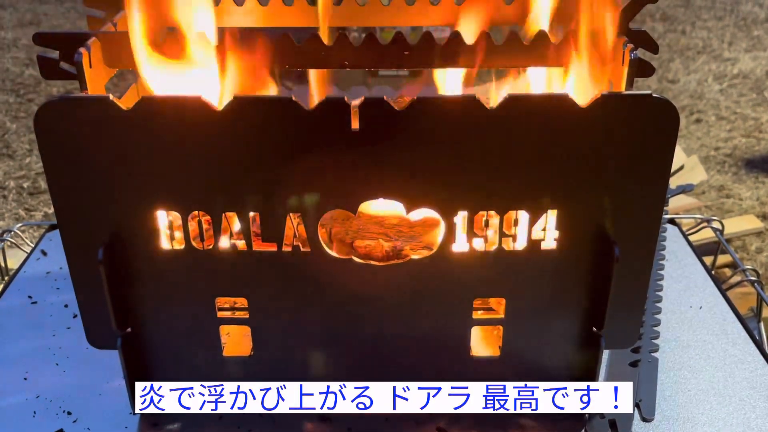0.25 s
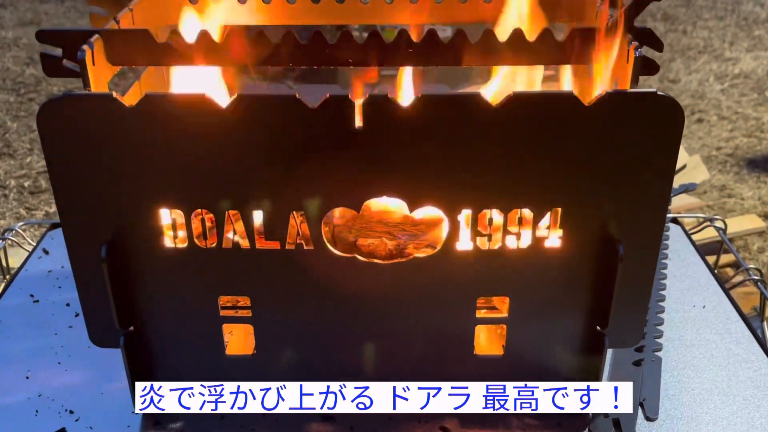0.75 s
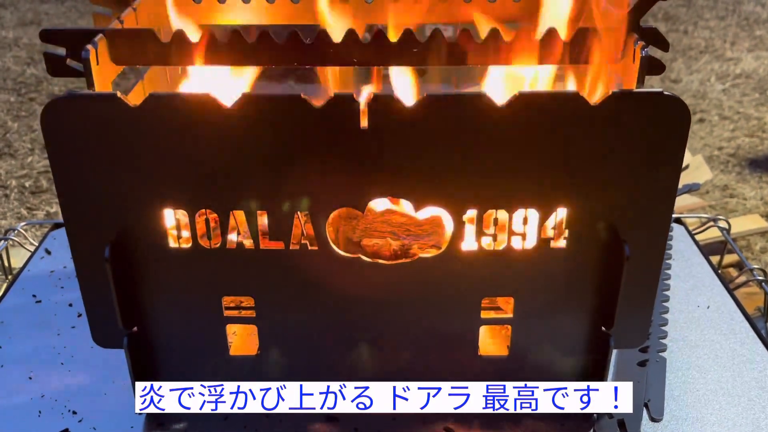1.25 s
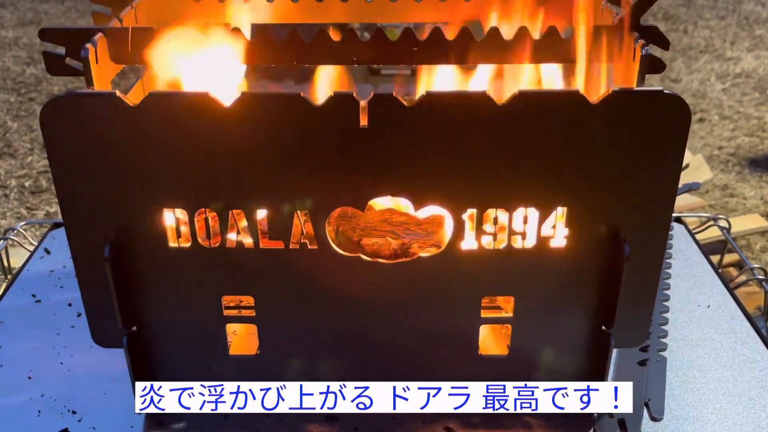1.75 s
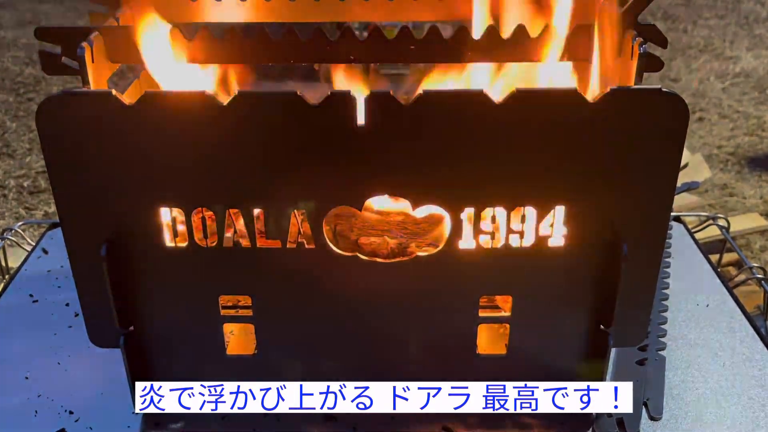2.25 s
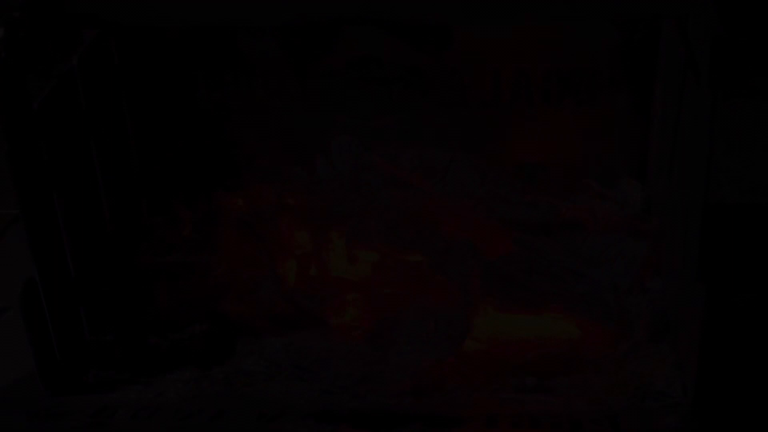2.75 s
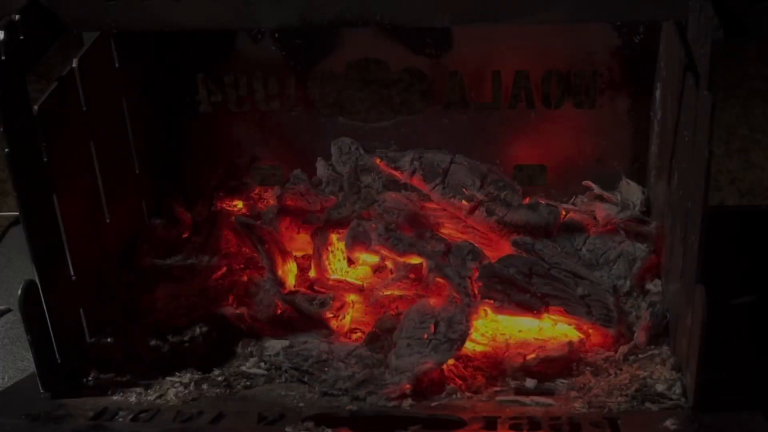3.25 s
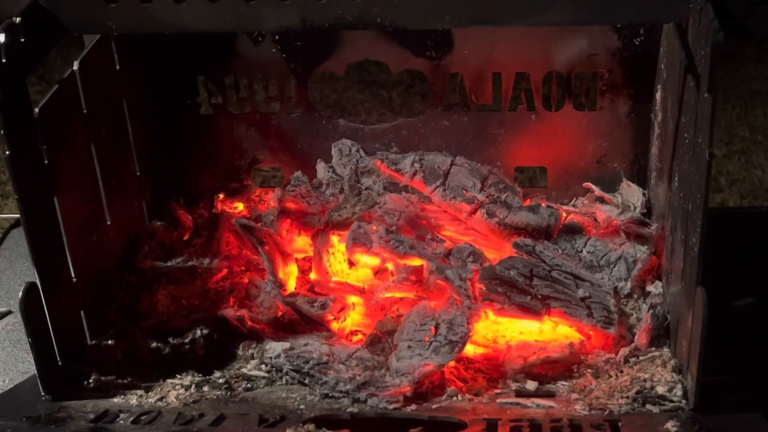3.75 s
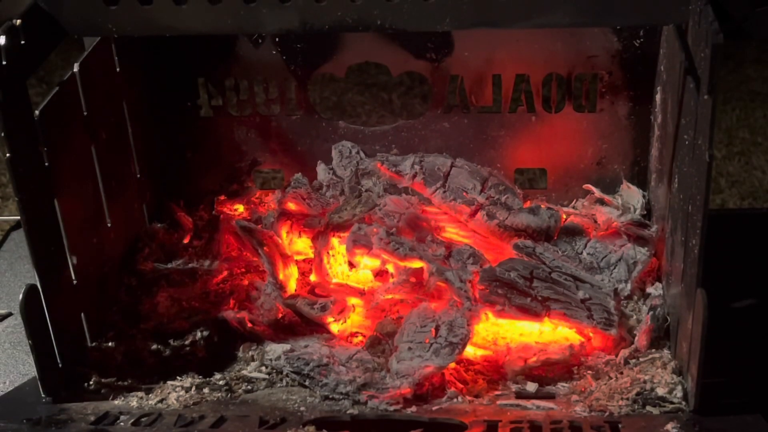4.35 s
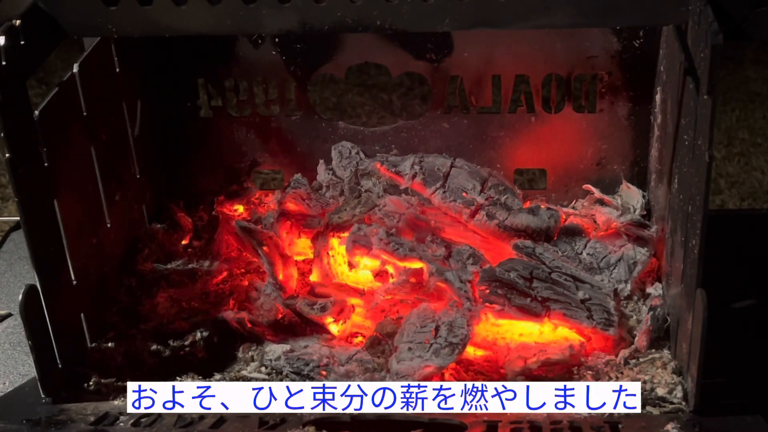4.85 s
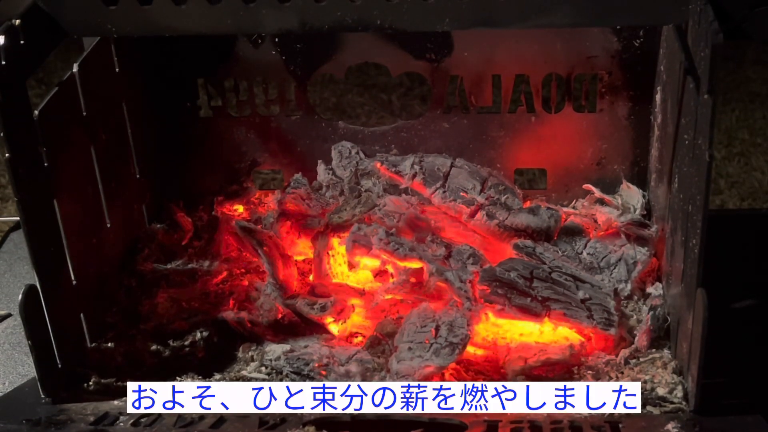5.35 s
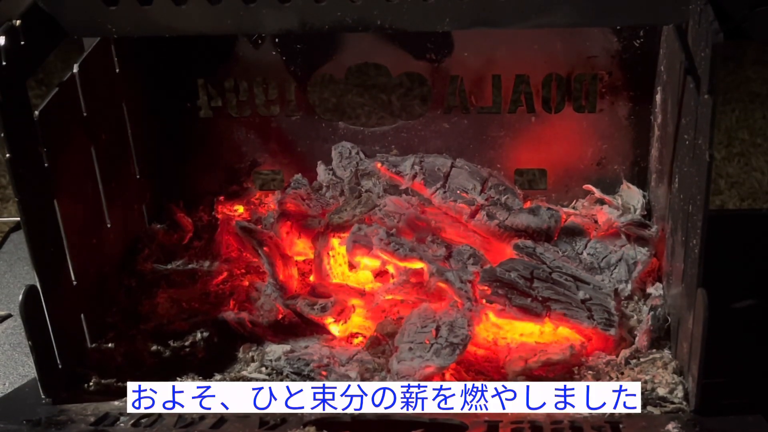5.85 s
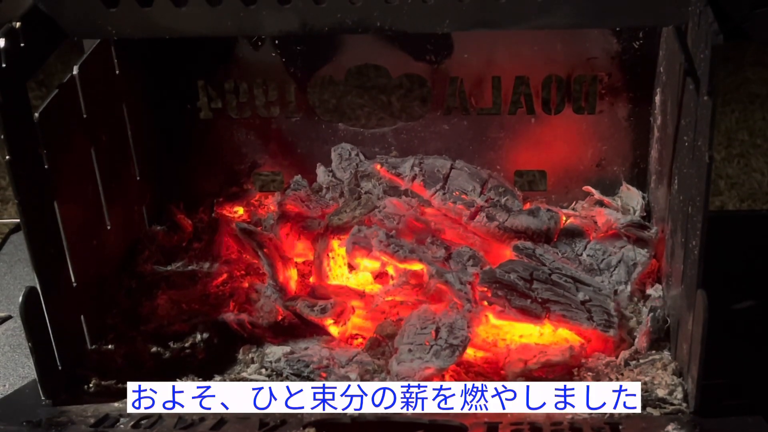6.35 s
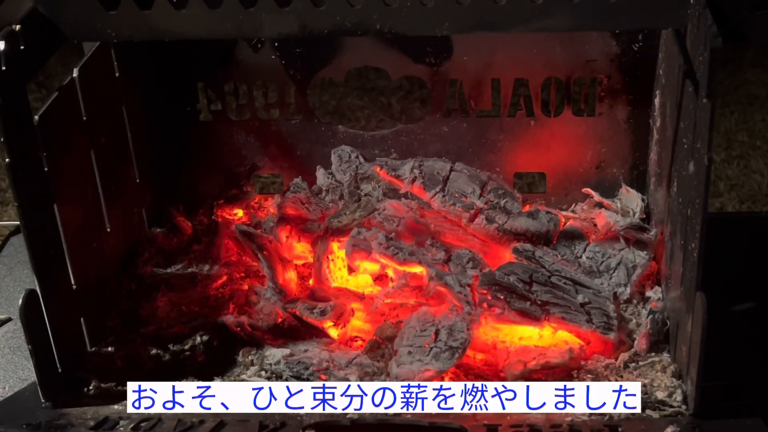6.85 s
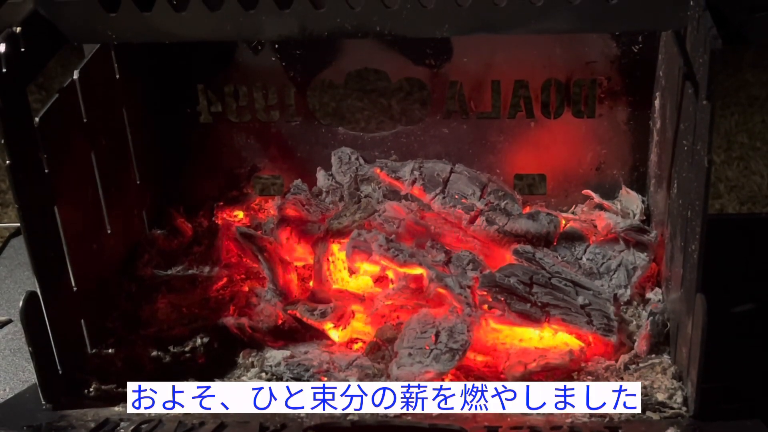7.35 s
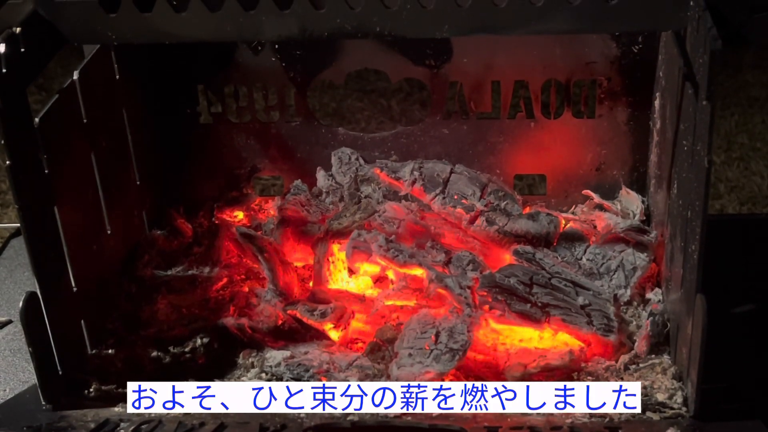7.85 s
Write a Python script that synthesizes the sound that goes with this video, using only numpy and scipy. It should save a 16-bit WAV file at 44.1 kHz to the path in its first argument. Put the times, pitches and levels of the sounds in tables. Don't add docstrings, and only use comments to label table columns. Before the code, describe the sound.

A wood fire in a steel box snaps loudly with puffing flames and hiss, then cuts to quiet embers ticking sparsely, with one late sharp crack.

```python
import sys
import numpy as np
from scipy import signal
from scipy.fft import rfft, irfft, next_fast_len
from scipy.io import wavfile
from scipy.ndimage import map_coordinates

SR = 44100
rng = np.random.default_rng(int(sys.argv[2]) if len(sys.argv) > 2 else 0)


def gain_from_db(level_db):
    decades = np.asarray(level_db, float) / 20
    return 10 ** decades


def inscribe(sig):
    pcm = np.round(np.clip(np.atleast_2d(sig).T, -1, 1) * 32767)
    wavfile.write(sys.argv[1], SR, pcm.astype(np.int16))


N = 357651
SCENE_CHANGE_S = 2.672

BOX_TONES = [2800, 4350, 5500]
# [freq_hz, gain_db]
PORT_RESONANCE = [(5000, -0.5), (8600, 6), (9700, 10), (10800, 17), (12100, -0.5), (13000, -16),
                  (15300, -12), (17000, -16.5)]


def unit(x):
    return x / np.sqrt(np.mean(x ** 2) + 1e-20)


def along(points, hz):
    f, v = np.transpose(points)
    return np.interp(np.log(hz + 1), np.log(f + 1), v)


def wobble(rate):
    knots = rng.standard_normal(int(N * rate / SR) + 4)
    return map_coordinates(knots, [np.arange(N) * rate / SR])


def filtered(x, response):
    length = x.shape[-1]
    m = 2 * next_fast_len(length // 2 + min(length // 2, 4096))
    return irfft(rfft(x, m) * response(np.fft.rfftfreq(m, 1 / SR)), m)[..., :length]


def causal(db):
    cepstrum = irfft(np.log(gain_from_db(db)))
    half = len(cepstrum) // 2
    return np.exp(rfft(np.r_[cepstrum[0], 2 * cepstrum[1:half], np.zeros(half)]))


def rush(spectrum, channels=1):
    noise = rng.standard_normal((channels, N))
    return unit(filtered(noise, lambda hz: gain_from_db(along(spectrum, hz))))


def band(rows, low_hz, high_hz):
    edges = [low_hz, min(high_hz, .45 * SR)]
    y = signal.sosfilt(signal.butter(2, edges, "band", fs=SR, output="sos"), rows)
    return y / np.abs(y).max(axis=1, keepdims=True)


def placed(seconds, rows):
    starts = np.round(np.asarray(seconds) * SR).astype(int)[:, None]
    at = starts + np.arange(rows.shape[1])
    return np.bincount(at.ravel(), rows.ravel(), N + 2 * SR)[:N]


def resonance(f, centre_hz, width_hz):
    return 1j * f * width_hz / (centre_hz ** 2 - f * f + 1j * f * width_hz)


def cracks(seconds, crack_db, snap_db, snap_hz, thump_db, length_ms, rattle_db, rattle_t60, echo_db,
           box_share, crack_hz=6500, size=2048):
    t = np.arange(size) / SR
    life = np.clip(length_ms, .2, 20)[:, None] / 1000
    noise = rng.standard_normal((len(seconds), size))
    volley = np.abs(noise) * np.exp(-(t / life) ** 2)
    rattle = gain_from_db(rattle_db - 60 * t / rattle_t60) + gain_from_db(echo_db - 60 * t / .08)
    burst = (1 - np.exp(-t / 0.00016)) * noise * (volley + rattle)

    centre = snap_hz[:, None]
    width = centre * np.interp(crack_db, [-50, -20], [.14, .5])[:, None]

    def ringing(f):
        box = resonance(f, BOX_TONES[0], 330) - 0.86 * resonance(f, BOX_TONES[1], 360)
        return 1.8 * width / centre + resonance(f, centre, width) + box_share * box

    ring = filtered(burst, ringing)
    push = t / .0012 * np.exp(1 - t / 0.00062) * np.sin(2 * np.pi * 470 * t) + 0.55 * burst
    crack = band(band(burst, crack_hz, 20000), crack_hz, 14000)
    snap = gain_from_db(snap_db)[:, None] * band(band(ring, 2200, 5600), 2100, 12000)
    thump = gain_from_db(thump_db)[:, None] * band(push, 300, 1000)
    return placed(seconds, gain_from_db(crack_db)[:, None] * (crack + snap + thump))


def blaze_pops():
    # [start_s, crack_db, snap_db, snap_hz, thump_db]
    strong = [(0.0606, -39, -19, 5600, -20.5), (0.2716, -45.5, 1, 4700, 3.5),
              (0.3752, -26, -17.5, 4530, -19), (0.403, -31.5, -9, 4830, -19),
              (0.4738, -28, -7.5, 6000, -13.5), (0.4883, -32.5, -10.5, 4870, -27),
              (0.5112, -27, -3.5, 3180, -13), (0.614, -27.5, -12.5, 4440, -13),
              (0.6228, -23.5, -8.5, 6250, -11), (0.7869, -38.5, -18.5, 6000, -23),
              (0.9634, -12, -12, 3600, -6), (0.989, -44.5, -0.5, 5470, -15), (1.361, -21, -13, 3250, -1.5),
              (1.4404, -22.5, -10.5, 5350, -18.5), (1.5548, -44.5, -0.5, 6100, -11.5),
              (1.8437, -32.5, -4.5, 4500, -12), (2.074, -30, -12, 6020, -18),
              (2.204, -27.5, -23, 5450, -50), (2.3325, -34, -11.5, 3930, -40.5),
              (2.4621, -36, -21, 5250, -38), (2.5229, -51, -1, 4160, 7), (2.6298, -31, -15.5, 5000, -23),
              (2.6387, -32, -1, 6000, -10)]
    # [start_s, crack_db, snap_db]
    small = [(0.0727, -46, -2.5), (0.112, -50, -13), (0.13, -42.5, -21), (0.297, -42, -21),
             (0.3793, -50, -38), (0.3965, -45, -7), (0.6803, -43, -11), (0.7037, -42, -12),
             (0.711, -46, -14), (0.77, -65.5, 11), (1.238, -47.5, -9), (1.258, -39, -20),
             (1.3037, -44.5, -19), (1.343, -56.5, -2), (1.5183, -41.5, -12.5), (1.628, -42.5, -15),
             (1.6805, -45, -6), (1.8287, -52, -2), (1.9234, -45, -20), (2.001, -47.5, -18),
             (2.0507, -40, -19), (2.1683, -40, -9.5), (2.1843, -39, -14.5), (2.2378, -43, -17),
             (2.3187, -49, -9), (2.371, -47, -12), (2.476, -49.5, -6), (2.6107, -45, -16), (0.501, -42, -5),
             (0.78, -50, -5), (1.4232, -48, -16), (2.5885, -52, -7)]
    # [start_s, crack_db, snap_db]
    sparks = [(0.0362, -49, -16), (0.161, -50.5, -16), (0.2144, -55, -27), (0.259, -54, -11),
              (0.3306, -54.5, -14), (0.4319, -49, -7), (0.559, -49.5, -5), (0.7537, -47, -21),
              (0.822, -53, -24.5), (1.0032, -48.5, 4), (1.1952, -56, -22), (1.4804, -59, -6),
              (1.585, -49, -18), (1.6492, -53.5, -4), (1.697, -49, -22), (1.7746, -50, -20),
              (1.975, -49, -13), (1.9904, -47.5, -22), (2.0276, -51, -21), (2.1321, -49.5, -10),
              (2.2677, -55, -10), (2.2952, -51.5, -3.5), (2.447, -52, -25)]
    s, crack_db, snap_db = np.c_[np.transpose(small), np.transpose(sparks) + [[0], [2.5], [-6]]]
    snap_hz = 5060 * gain_from_db(rng.normal(0, 2.5, len(s)))
    spits = [s, crack_db, snap_db, snap_hz, snap_db - 13]
    s, crack_db, snap_db, snap_hz, thump_db = np.c_[np.transpose(strong), spits]
    length_ms = np.interp(crack_db, [-50, -10], [1.1, 1.5])
    return cracks(s, crack_db - 5.0, snap_db + 7.5, snap_hz, thump_db + 8, length_ms,
                  rattle_db=-6.5, rattle_t60=0.032, echo_db=-40, box_share=0.23)


def splits():
    # [start_s, peak_db]
    big = [
        (0.9637, -7.5),
        (1.361, -16.5),
        (7.4857, -16.5),
    ]
    # [mode_hz, width_hz, level_db]
    log_modes = [
        [(1560, 200, -6.5), (2090, 150, -9), (2710, 440, 0), (4810, 420, -2), (6300, 260, -8), (8030, 220, -5), (8300, 350, -2), (9570, 320, -3.5), (10800, 270, -6)] + [(1050, 220, -4)],
        [(3290, 330, 0.5), (6010, 430, -15.5), (7220, 290, -10), (8400, 470, -4), (9086, 170, -6), (11100, 250, 1)],
        [(1570, 160, -22), (2440, 390, -6.5), (3960, 610, -2.5), (5320, 270, -4.5), (6360, 220, -5), (7200, 440, -5.5), (8500, 430, -9), (9300, 330, -8), (11180, 320, -2), (12300, 630, -8.5)] + [(1160, 180, -20), (865, 180, -23)],
    ]
    t, rows = np.arange(1024) / SR, []
    for modes in log_modes:
        hz, width, db = np.transpose(modes)[..., None]
        since = np.clip(t - .0005 * rng.random(hz.shape) - 1.2 / hz, 0, 1)
        shape = np.exp(-4.2 * width * since) * (1 - np.exp(-since / 0.00022))
        level = gain_from_db(db - along(PORT_RESONANCE, hz)) * width
        ring = (level * shape * np.sin(2 * np.pi * hz * since)).sum(axis=0)
        rows.append(ring / np.abs(ring).max())
    s, db = np.transpose(big)
    return placed(s, gain_from_db(db)[:, None] * rows)


def licks():
    # [start_s, peak_db, push_db, edge_db]
    puffs = [(0.047, -55, -7, -16), (0.115, -59, 1, -21), (0.152, -51.5, -5, -26), (0.179, -51, -2, -33),
             (0.202, -50.5, -8, -36), (0.326, -53, -4, -15), (0.357, -43, -11, -15.5), (0.447, -57, 1, -2),
             (0.542, -50, -4, -17), (0.646, -40.5, -11, -21), (0.709, -48.5, -12, -21),
             (0.782, -51, -6, -28), (0.804, -51.5, -5, -16), (0.983, -46.5, -1, -24),
             (1.004, -47.5, -2, -22.5), (1.102, -45, -16, -13), (1.223, -54, -5, -28),
             (1.247, -49.5, -8, -28), (1.283, -53, -4, -24), (1.398, -51, -4, -13), (1.51, -46.5, -16, -15),
             (1.558, -54, -5, -16), (1.597, -55, -3, -24), (1.671, -45.5, -8, -17), (1.826, -47, -8, -14),
             (1.895, -54, 2, -11.5), (1.933, -54, 1, -23), (1.975, -53, 0, -15), (1.996, -50, -3, -24),
             (2.009, -44.5, -8, -24), (2.104, -67, 5, -5), (2.147, -50, -8, -20), (2.186, -58, -9, -16),
             (2.255, -52, -2, -19), (2.273, -49, -4, -26), (2.282, -46.5, -6, -18),
             (2.298, -44.5, -10, -17), (2.326, -50, -12, -21), (2.415, -45.5, -13, -23),
             (2.433, -54, -4, -24), (2.524, -45, -14, -11), (2.537, -44.5, -12, -12.5),
             (2.58, -43.5, -15, -21), (2.622, -43, -18, -8.5), (0.948, -43, -10, -18)]
    # [freq_hz, level_db_per_hz]
    flap_colour = [(150, -29.5), (300, -5.5), (480, -1), (800, -11), (1400, -24), (3000, -37), (8000, -54)]
    s, db, push_db, edge_db = np.transpose(puffs)
    t = np.arange(2048) / SR
    noise = rng.standard_normal((2, len(s), len(t)))
    flap = filtered(noise[0], lambda hz: gain_from_db(along(flap_colour, hz))) * t * np.exp(-t / 0.0055)
    flap = flap / np.abs(flap).max(axis=1, keepdims=True)
    flap_hz, push_hz = gain_from_db(rng.normal(0, 1.5, (2, len(s), 1))) * [[[420]], [[105]]]
    sinking = t + 0.0011 * (1 - np.exp(-t / .0015))
    fall = np.sin(2 * np.pi * flap_hz * sinking) * t / .0015 * np.exp(1 - t / .0015)
    push = np.sin(2 * np.pi * push_hz * t) * t / 0.0028 * np.exp(1 - t / 0.004)
    edge = band(noise[1] * np.exp(-t / .0025), 800, 2100)
    rows = .25 * flap + .95 * fall + gain_from_db(push_db + 3.0)[:, None] * push
    rows = rows + gain_from_db(edge_db + 6.5)[:, None] * edge
    return placed(s, gain_from_db(db - 0.5)[:, None] * rows)


def ember_ticks():
    # [start_s, crack_db, snap_db, snap_hz]
    clear = [(2.7883, -42.5, -29.5, 2690), (2.9114, -47.5, -18.5, 4140), (3.0523, -40.5, -18, 4420),
             (3.1001, -40, -25, 5570), (3.1179, -41.5, -20, 4130), (3.261, -37.5, -34, 3800),
             (3.365, -43, -16.5, 4440), (4.091, -36, -19, 5790), (4.2159, -44, -30, 5430),
             (4.3584, -45, -16, 5230), (4.374, -43, -17, 4400), (4.396, -35.5, -37, 5300),
             (4.5, -29, -10.5, 4310), (4.67, -50, -17, 5770), (4.9483, -41.5, -21, 3710),
             (5.005, -48.5, -34, 4470), (5.7323, -48.5, -33, 4264), (6.1364, -43, -27, 3100),
             (6.3723, -50.5, -18.5, 2960), (6.5766, -41, -20, 4290), (6.6237, -45.5, -18, 4290),
             (6.6616, -43, -16, 4200), (6.6818, -42.5, -17, 4030), (7.119, -41.5, -21.5, 2850),
             (7.1842, -46.5, -22, 4270), (7.4855, -16.5, -10.5, 4100), (7.5695, -37, -33, 4380),
             (7.5915, -47.5, -11.5, 4360), (7.6743, -47, -11, 5470), (4.9287, -53, -15, 4300),
             (7.5559, -52.5, -20, 4300)]
    # [start_s, crack_db, snap_db]
    faint_early = [(2.815, -61.5, -11), (2.8306, -67, -10), (2.979, -60.5, -11.5), (3.072, -48, -21),
                   (3.1327, -52, -23), (3.1575, -54, -27), (3.1895, -59, -23.5), (3.2894, -59, -25),
                   (3.3233, -63, -17.5), (3.3684, -56, -20), (3.3847, -63, -18), (3.4633, -57, -10),
                   (3.571, -55.5, -10), (3.6162, -64.5, -10), (3.6561, -51.5, -23), (3.7268, -54, -21),
                   (3.7318, -55, -16), (3.7554, -61.5, -27), (3.7723, -60, -25), (3.7908, -61, -30),
                   (3.8102, -55, -32), (3.8576, -56, -18), (3.928, -52, -16), (4.0363, -57.5, -11),
                   (4.1104, -58, -21), (4.1789, -61, -15), (4.2418, -51, -31.5), (4.3675, -48.5, -16),
                   (4.4563, -59, -19), (4.7506, -62, -13.5), (4.8194, -58, -16), (4.9861, -56, -25),
                   (5.025, -49, -38), (5.0898, -64, -20), (5.1073, -60.5, -16), (5.1172, -55, -27.5),
                   (5.1582, -54.5, -21), (5.223, -56, -20), (5.234, -53, -22), (5.243, -57, -19),
                   (5.3666, -55, -13), (5.4246, -60, -25), (5.4951, -65, -9.5), (5.5054, -62, -26),
                   (5.5623, -55.5, -28), (5.8272, -62, -13), (5.9519, -58.5, -23), (5.9981, -52, -23.5)]
    faint_late = [(6.0282, -58, -23), (6.0613, -60.5, -10), (6.111, -51, -26), (6.1804, -60, -17),
                  (6.2287, -61, -14), (6.2504, -62, -12), (6.2716, -59.5, -16.5), (6.4023, -63, -15),
                  (6.429, -53.5, -21), (6.439, -52, -30), (6.4692, -55.5, -25), (6.6987, -55, -11),
                  (6.762, -60, -13), (6.781, -60, -19), (6.882, -60.5, -8.5), (6.9143, -60, -25),
                  (6.984, -53, -30), (7.0197, -62, -17), (7.0429, -53.5, -18), (7.0718, -60, -26),
                  (7.136, -56, -22), (7.1528, -57.5, -15), (7.2609, -56, -14), (7.3806, -61.5, -12.5),
                  (7.435, -61, -23), (7.6525, -58, -19), (7.7498, -61, -24.5), (7.9798, -59, -21),
                  (8.0631, -64.5, -13)]
    s, crack_db, snap_db = np.c_[np.transpose(faint_early), np.transpose(faint_late)]
    faint = [s, crack_db + 2.5, snap_db + 0.5, rng.choice(BOX_TONES[:2], len(s))]
    s, crack_db, snap_db, snap_hz = np.c_[np.transpose(clear), faint]
    length_ms = np.interp(crack_db, [-55, -15], [.7, 1.9])
    return cracks(s, crack_db - 4.5, snap_db + 10.5, snap_hz, snap_db - 34, length_ms,
                  rattle_db=-4.5, rattle_t60=0.026, echo_db=-63.5, box_share=0.37, crack_hz=8210)


def metal_clanks():
    # [start_s, peak_db]
    clank_events = [(2.715, -62.5), (3.002, -62), (3.427, -60), (3.919, -61.5), (4.355, -59.5), (4.779, -61.5),
                    (4.925, -68.5), (5.199, -62), (5.615, -61), (6.068, -59.5), (6.707, -59), (7.248, -61),
                    (7.599, -63), (7.93, -66)]
    # [mode_hz, level_db, t60_s]
    main_modes = [(918, -2, 0.62), (1095, -7, 0.74), (1740, -11.5, 0.83), (1990, -3, 0.43),
                  (2190, -10.5, 0.39), (2255, -13, 0.83), (2570, -12.5, 0.44), (2760, -4.5, 0.41),
                  (2855, -2.5, 0.58), (2910, -18.5, 1.4), (3085, -7.5, 0.5), (3260, -12, 0.71),
                  (3690, -9.5, 0.47), (4335, -4, 0.35)]
    second_modes = [(1090, -6, 0.8), (1650, -8, 0.48), (1730, -2, 0.63), (1976, -0.5, 0.29), (2164, -6, 0.47),
                    (2428, -0.5, 0.35), (2536, -4, 0.38), (2740, -16, 0.75), (2826, -2.5, 0.39),
                    (3300, -13, 0.42), (3779, -8, 0.37), (4280, -5, 0.21)]
    third_modes = [(937, -5, 0.59), (1297, 4, 0.28), (1965, -9, 1.0), (2180, -4, 0.34), (2541, -4, 0.85),
                   (2729, -9, 0.4), (2826, -7, 0.35), (3085, -8, 0.25), (3295, -15, 0.46), (3666, -5, 0.29),
                   (3876, -12, 0.27), (4300, -4, 0.34)]
    # [freq_hz, level_db_per_hz]
    knock_colour = [(500, 3), (900, 4.5), (2500, 1), (4500, -11.5), (5500, -9), (9000, -26)]
    other_modes = {8: second_modes, 7: third_modes}
    spread = [[.001], [.012], [.025], [.035], [.05], [.07]]
    t, rows = np.arange(SR // 3) / SR, []
    for k, (s, db) in enumerate(clank_events):
        ring = 0
        for hz, level_db, t60 in other_modes.get(k, main_modes):
            mode_hz = hz * (1 + rng.standard_normal((6, 1)) * spread)
            tone = np.sin(2 * np.pi * (mode_hz * t + rng.random((6, 1))))
            fade = gain_from_db(level_db + rng.normal(0, 1.4) - 60 * t / min(t60, .52))
            fade = fade * (1 - np.exp(-t * hz / 9))
            ring = ring + fade * (1.23 * tone[0] + 0.35 * tone[1:].sum(axis=0))
        knock = unit(filtered(rng.standard_normal(len(t)), lambda hz: gain_from_db(along(knock_colour, hz))))
        knock = (1.17 * gain_from_db(-60 * t / 0.52) + 0.78 * gain_from_db(-60 * t / 0.05)) * knock
        scrape = band(rng.standard_normal((1, len(t))), 3100, 10000)[0]
        ring = ring + knock + 3 * gain_from_db(-60 * t / 0.19) * scrape
        rows.append(gain_from_db(db - 10.5) * (1 - np.exp(-t / 0.00095)) * ring)
    return placed([s for s, db in clank_events], np.array(rows))


def yard(x):
    t = np.arange(SR // 4) / SR
    tail = band(rng.standard_normal((2, len(t))), 900, 6000)
    tail = tail * gain_from_db(-60 * t / .3) * (1 - np.exp(-t / 0.0088))
    return gain_from_db(-39) * signal.fftconvolve(x[None], tail / np.linalg.norm(tail[0]), axes=1)[:, :N]


def fire_and_clanks():
    bursts = blaze_pops() + ember_ticks() + splits()
    clanks = metal_clanks()
    near = bursts + licks()

    def to_right(hz):
        lag = .15 + .5 * np.exp(-((hz - 3200) / 2500) ** 2)
        return gain_from_db(-0.66) * np.exp(-1j * lag)

    direct = np.array([near, filtered(near, to_right)]) + clanks * gain_from_db([[.4], [-.4]])
    return direct + yard(bursts + gain_from_db(20.5) * clanks)


def crackle(level_db):
    chance = rng.random((1200, 4))
    seconds = chance[:, 0] * (N - 1) / SR
    lift_db = np.where(seconds < SCENE_CHANGE_S, 6, 11)
    size_db = level_db[(seconds * SR).astype(int)] + lift_db - 3 * np.log(chance[:, 1])
    snap_db = -24 + 17 * chance[:, 2] ** 1.2
    box_hz = np.where(chance[:, 3] < .5, 2850, 4300)
    even = np.ones(len(seconds))
    ticks = cracks(seconds, np.minimum(size_db, -65), snap_db, box_hz, -70 * even, .9 * even,
                   rattle_db=-6, rattle_t60=.02, echo_db=-60, box_share=.6, crack_hz=8200, size=512)
    return filtered(ticks, lambda hz: 1 / (1 + (hz / 12800) ** 30))


def gas_hiss(level_db):
    # [freq_hz, level_db_per_hz]
    hiss_colour = [(1000, -26), (2500, -9.5), (5000, -2.5), (8000, -2.5), (10600, -2.5), (12300, -4),
                   (13200, -20.5), (15000, -49.5)]
    jets = rush(hiss_colour)[0]
    top = filtered(jets, lambda hz: 1 / (1 + (9500 / (hz + 1)) ** 12))
    return gain_from_db(level_db - 3.5) * (jets + (gain_from_db(3.5 * wobble(16)) - 1) * top)


def gas_roar(gust_db):
    # [freq_hz, level_db_per_hz]
    roar_colour = [(500, -20), (1000, -3), (1800, 0), (2800, -4), (4500, -30)]
    return gain_from_db(-87 + 0.35 * gust_db + 4.5 * wobble(6) + 3 * wobble(35)) * rush(roar_colour)


def flame_flutter(air_db):
    # [freq_hz, level_db_per_hz]
    flutter_colour = [(70, -27), (130, 2), (250, -6), (450, -9), (800, -23), (1500, -39), (4000, -67.5)]
    both = rush(flutter_colour) + 0.21 * rush(flutter_colour, channels=2)
    return gain_from_db(air_db + 1.5 + 4.5 * wobble(41)) * both


def draught_rumble(draught_db):
    # [freq_hz, level_db_per_hz]
    rumble_colour = [(18, -45), (27, -21), (40, -7), (64, 1), (103, -8), (135, -18), (300, -36),
                     (600, -120)]
    both = rush(rumble_colour) + .12 * rush(rumble_colour, channels=2)
    return gain_from_db(draught_db + 3.0 + .7 * wobble(4.2) + 1.2 * wobble(17)) * both


def open_air(air_db):
    # [freq_hz, level_db_per_hz]
    air_colour = [(80, -44.5), (200, 0.5), (500, -7), (1200, -10), (2200, -17.5), (4000, -16.5),
                  (7000, -32), (12000, -42.5)]
    apart = filtered(rush(air_colour, channels=2), lambda hz: 1 / (1 + (hz / 1700) ** 8))
    return gain_from_db(air_db + 0.57 * wobble(12)) * (rush(air_colour) + 1.4 * apart)


def scene():
    # [time_s, level_db]
    draught = [(0.0, -67), (0.2, -62.5), (0.63, -57.5), (0.79, -69.5), (1.0, -55.5), (1.26, -66),
               (1.41, -56.5), (1.6, -67.5), (2.04, -60.5), (2.4, -66), (2.67, -63), (2.69, -57.5),
               (3.18, -58.5), (3.68, -64), (5.15, -65), (6.63, -62.5), (7.62, -64.5), (8.11, -60)]
    t = np.arange(N) / SR
    burning = t < SCENE_CHANGE_S
    draught_db = np.interp(t, *np.transpose(draught))
    gust_db = draught_db - draught_db[burning].mean()
    air_db = np.where(burning, -69.5 + .7 * gust_db, -82.5)
    glow_db = -83 - 1.3 * (t - SCENE_CHANGE_S)
    hiss_db = np.where(burning, -71.5 + .15 * gust_db, glow_db)
    hiss_db = hiss_db + 2.2 * wobble(4.4) + 3 * wobble(8) + 0.51 * wobble(28)
    flames = burning * (gas_roar(gust_db) + flame_flutter(air_db))
    background = draught_rumble(draught_db) + open_air(air_db - 9.3 * burning)
    return fire_and_clanks() + crackle(hiss_db) + gas_hiss(hiss_db) + flames + background


def low_pass(x):
    return signal.sosfilt(signal.butter(12, 16820, fs=SR, output="sos"), x)


def record(dry):
    # [freq_hz, lead_rad]
    left_lead = [(0, 0), (7000, 0), (8000, .25), (8700, -.1), (10250, -3.14), (13600, -9.4), (16500, -14.5)]

    def port_response(hz):
        slip = np.exp(1j * np.interp(hz, *np.transpose(left_lead)) * [[1], [0]])
        return causal(along(PORT_RESONANCE, hz)) * slip

    ports = filtered(dry, port_response)
    since = np.arange(N) / SR - SCENE_CHANGE_S
    fade = np.where(since < 0, 1, np.clip(0.099 + since / 0.052, 0, 1))
    return low_pass(ports * fade)


dry = scene()
out = record(dry)
inscribe(out)
```